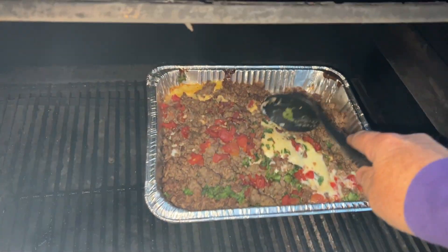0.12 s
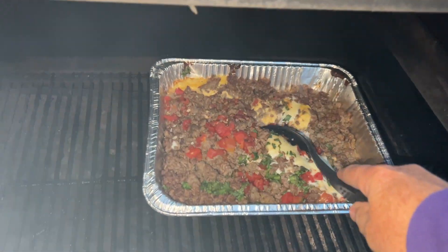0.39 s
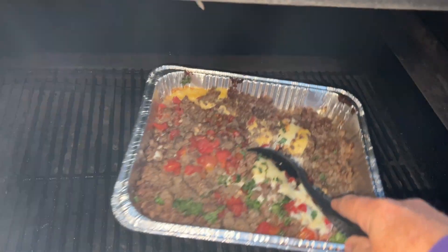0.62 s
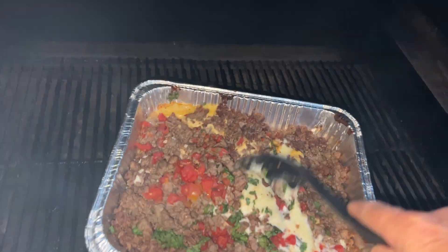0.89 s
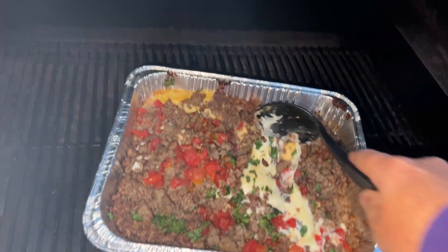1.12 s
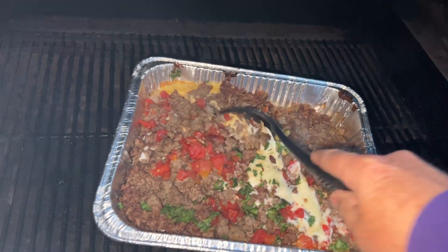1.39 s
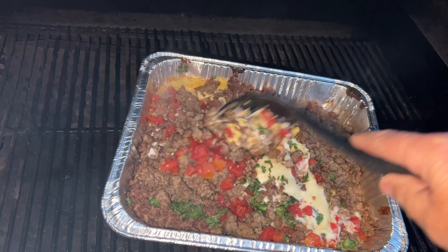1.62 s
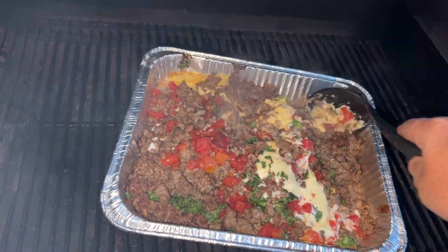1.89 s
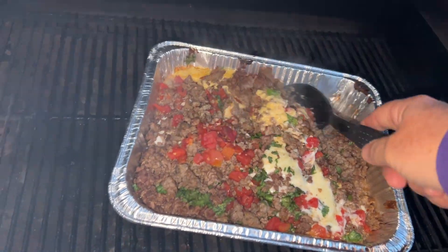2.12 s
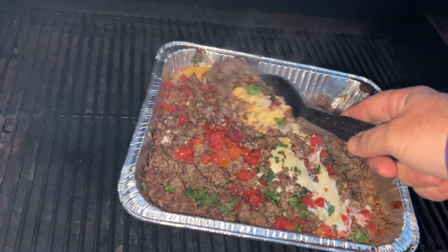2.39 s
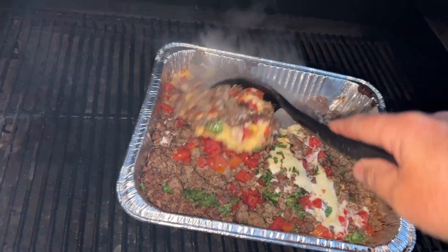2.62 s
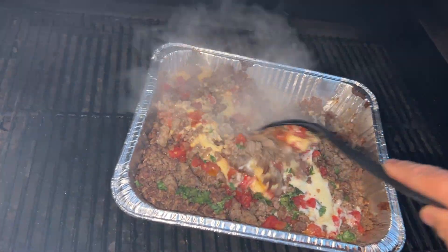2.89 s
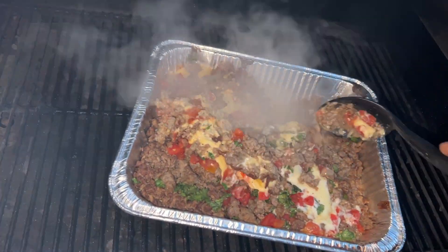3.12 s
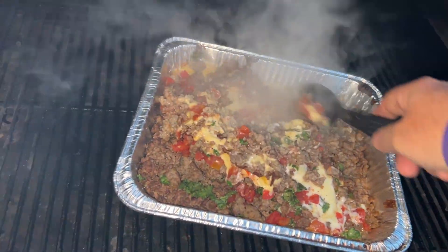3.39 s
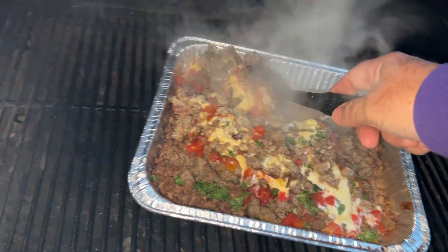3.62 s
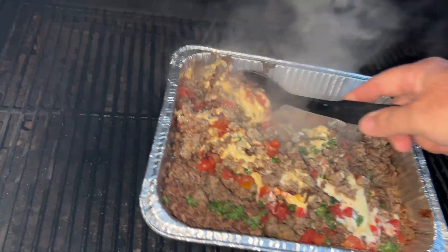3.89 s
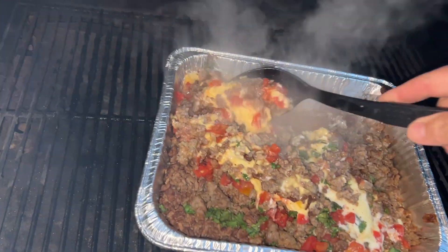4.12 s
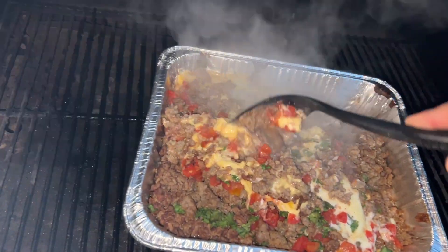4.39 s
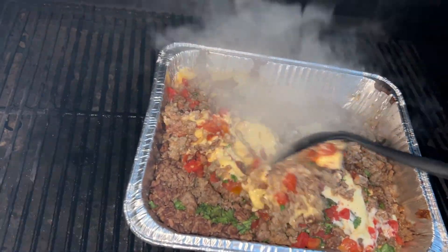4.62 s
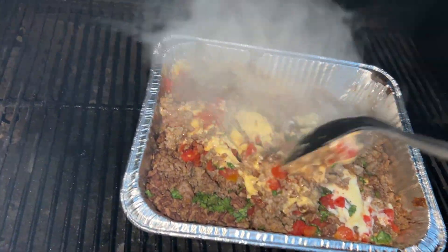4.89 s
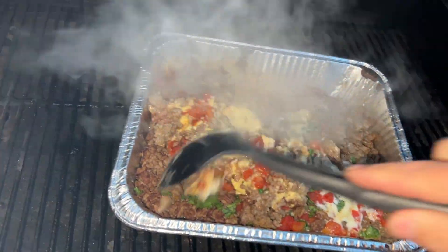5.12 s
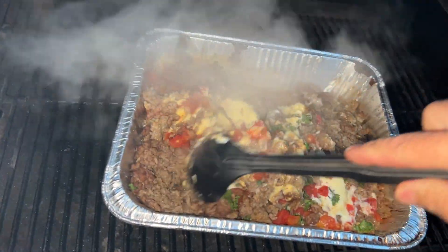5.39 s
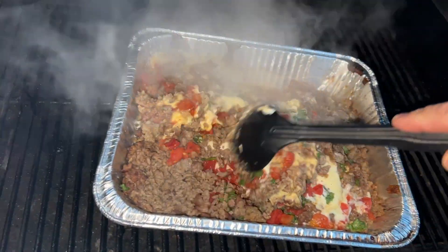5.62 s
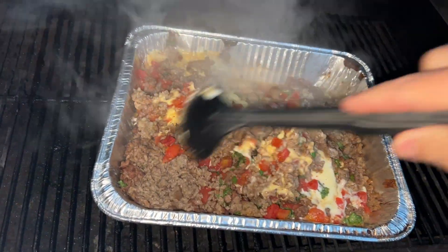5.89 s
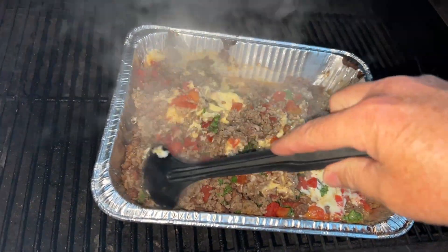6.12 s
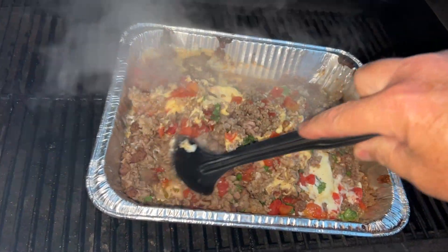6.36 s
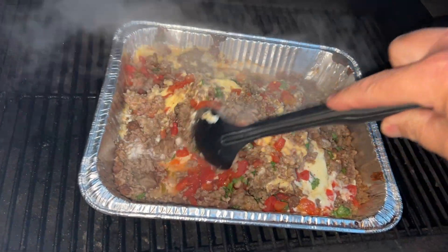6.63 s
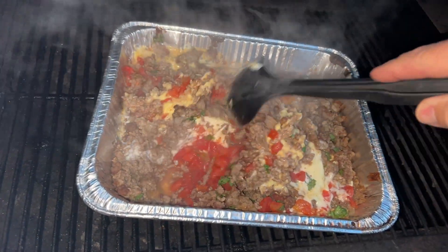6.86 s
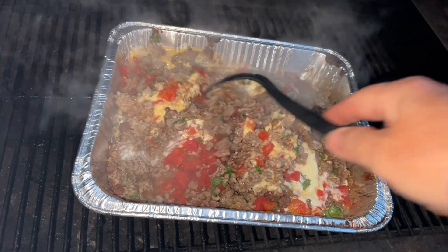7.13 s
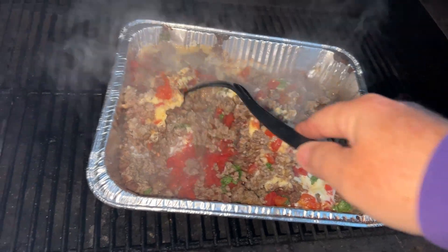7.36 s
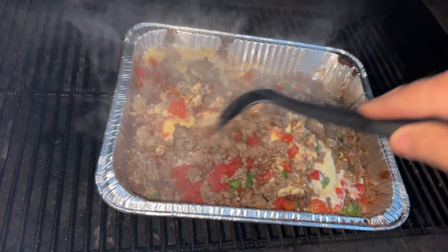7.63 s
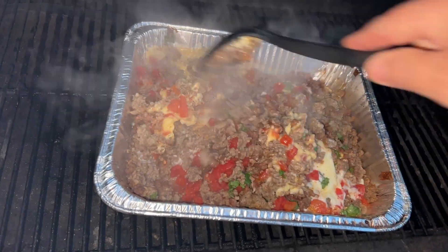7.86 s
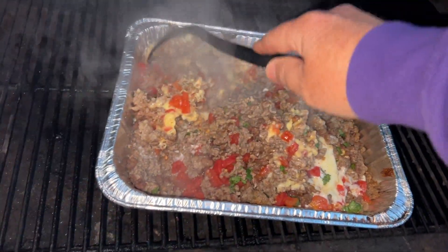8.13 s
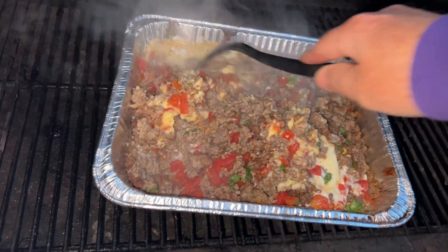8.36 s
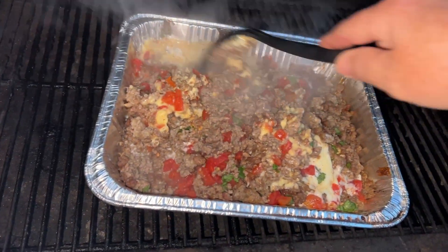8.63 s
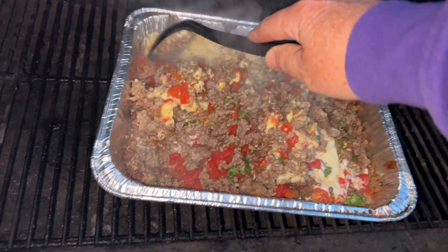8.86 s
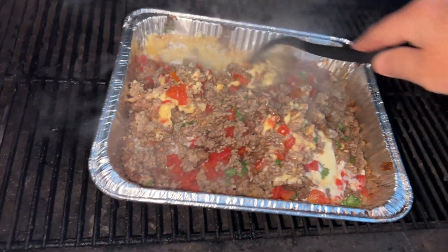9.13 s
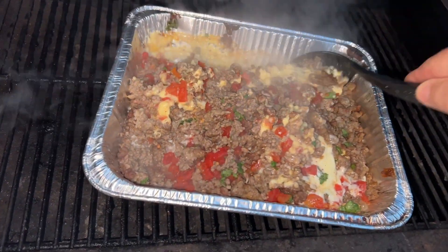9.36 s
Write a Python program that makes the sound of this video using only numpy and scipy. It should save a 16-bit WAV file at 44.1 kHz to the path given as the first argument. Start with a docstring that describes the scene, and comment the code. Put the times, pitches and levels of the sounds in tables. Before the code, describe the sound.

A deep, steady grill roar opens the scene, a low blower drone around 230 Hz mixed with fiery turbulence in a steel barrel, soft air hiss and faint fuzzy whistles. From 0.1 to 1 second a plastic spoon scrapes firmly across a foil tray with bright rustle and a knock near 0.6; smaller rubs and crisp ticks follow until about 1.8. Between 2.5 and 4.2 the roar flutters in uneven surges while dropping, the whistles having faded, with another clear scrape around 3.6. Afterwards the hum keeps sinking gently, leaving sparse light rubs, tiny crackles and foil ticks, the sharpest at 5.75. A thin whine near 8 kHz flickers in, notably at 3.0, 4.6, 5.7 and 8.35. Ticks and a dull knock cluster at 8.5, and a soft scrape comes around 9.1. Close stereo, bass centred, treble wide.

```python
"""A pellet grill's blower and fire roar inside the steel barrel and slowly ease off, with hiss and thin motor tones.
A plastic spoon turns food in a foil tray: the foil rustles, scrapes and ticks; a thin high whine comes and goes.
Roar, hiss and rubbing are shaped noise, motor and whine are sine waves, ticks and knocks are short noise bursts.
Two close microphone ports hear the bass nearly alike and the treble with turning phase."""
import sys
import numpy as np
from scipy import signal
from scipy.fft import rfft, irfft
from scipy.io import wavfile
from scipy.ndimage import uniform_filter1d

SR = 44100
rng = np.random.default_rng(int(sys.argv[2]) if len(sys.argv) > 2 else 0)


def undo_db(level):
    """Turn decibels back into plain size, where 20 dB means ten times bigger."""
    steps = np.asarray(level, float) / 20
    return 10 ** steps


def wav_record(signal):
    """Record a signal, one row per channel, as 16-bit PCM in the file named by sys.argv[1]."""
    frames = np.transpose(np.atleast_2d(signal))
    bounded = np.clip(frames, -1, 1)
    # unit amplitude maps onto the largest positive 16-bit level
    quanta = np.round(bounded * 32767).astype(np.int16)
    wavfile.write(sys.argv[1], SR, quanta)


N = 418950  # length in samples


def evened(x):
    """Scales a signal to an rms of one."""
    return x / np.sqrt(np.mean(x ** 2) + 1e-20)


def read(points, hz):
    """Reads a curve by straight lines on a nearly logarithmic frequency axis."""
    f, value = np.transpose(points)
    return np.interp(np.log(hz + 50), np.log(f + 50), value)


def over_time(rows):
    """Joins (seconds, value) rows by straight lines, giving a value at every sample."""
    seconds, value = np.transpose(rows)
    return np.interp(np.arange(N) / SR, seconds, value)


def drift(hz):
    """Slow random wavering of unit rms: a sum of sines up to hz, the slower ones larger."""
    t = np.arange(0, N, 64) / SR
    slow = 0
    for f in np.geomspace(hz / 20, hz, 24):
        slow = slow + np.sin(2 * np.pi * (f * t + rng.random())) / np.sqrt(f)
    return np.repeat(evened(slow), 64)[:N]


# How far the left port runs ahead. Each row: frequency in Hz, phase lead in radians.
PORT_LEAD = [(300, 0), (780, .4), (1640, -1.1), (3620, 1.4), (5770, -1.2), (7150, -.1), (8270, -1.3),
             (9100, -3.1), (10700, -3.2), (12500, -6.2), (14700, -6.5), (15700, -8)]
# How much louder the left port is. Each row: frequency in Hz, left over right in dB.
PORT_BALANCE = [(60, 1.5), (110, 1.5), (200, 1.0), (380, -1.0), (520, -5.0), (640, -4.0), (780, 3.0),
                (1290, 2.0), (2380, 2.5), (4400, 4.5), (8120, 0.5), (15000, 0.0)]


def ports(hz):
    """Phase and loudness differences between the two ports, shared half and half."""
    half = undo_db(read(PORT_BALANCE, hz) / 2) * np.exp(.5j * read(PORT_LEAD, hz))
    return np.array([half, 1 / half])


# How alike the two ports hear noise. Each row: frequency in Hz, likeness (0 unrelated, 1 the same).
PORT_LIKENESS = [(30, 0.78), (80, 1), (130, 0.99), (290, .99), (640, 0.75), (1400, 0.27), (3100, 0.1),
                 (6800, 0.18), (8500, 0.1), (9300, 0.97), (10600, 0.99), (12000, 0.21), (15000, .9)]


def noise(shape, size, patchy_db, flicker_db):
    """Random short-time spectra with drifting patches and a shared flicker, heard by both ports."""
    hop = size // 4
    frames, hz = N // hop + 5, np.fft.rfftfreq(size, 1 / SR)
    a, b, c, d, patches = rng.standard_normal((frames, len(hz), 5)).T
    patches = uniform_filter1d(patches, size=5, axis=0)  # neighbouring frequencies
    patches = evened(uniform_filter1d(patches, size=6, axis=1))  # neighbouring moments
    flicker = evened(uniform_filter1d(rng.standard_normal(frames), size=3))
    depth_db = (patchy_db * np.ones(N))[np.minimum(np.arange(frames) * hop, N - 1)]

    same = read(PORT_LIKENESS, hz)[:, None]
    left, other = a + 1j * b, c + 1j * d
    right = same * left + np.sqrt(1 - same ** 2) * other
    spectra = np.array([left, right]) * ports(hz)[:, :, None]
    spectra *= shape(hz)[:, None] * undo_db(depth_db * patches + flicker_db * flicker)
    sound = signal.istft(spectra, nperseg=size, noverlap=size - hop)[1]
    return evened(sound[:, :N])


def peaks(rows, hz):
    """Adds up narrow humps in a spectrum from rows of centre Hz, width Hz and dB."""
    return sum(undo_db(db) / (1 + (2 * (hz - f) / width) ** 2) for f, width, db in rows)


# Draught easing off, with the flame surging on the way down. Each row: time in seconds, low roar level in dB.
ROAR_LEVEL = [(0.0, -17), (0.08, -18), (1.66, -17), (2.56, -18.5), (2.62, -23.5), (2.86, -16.5),
              (2.88, -21.5), (3.09, -16.5), (3.2, -26), (3.23, -19), (3.57, -25), (3.73, -15.5),
              (3.75, -20.5), (3.99, -26.5), (4.05, -19.5), (4.21, -25.5), (7.7, -29), (9.5, -29)]
# Level of the upper barrel resonance. Each row: time in seconds, level in dB.
UPPER_LEVEL = [(0.0, -39.5), (0.02, -32), (1.03, -29), (3.7, -30), (4.52, -37.5), (8.04, -42.5),
               (8.33, -40.5), (9.5, -40)]
# Tone colour of the low roar. Each row: frequency in Hz, relative strength in dB per Hz.
BARREL_COLOUR = [(15, -51.5), (30, -29.5), (50, -34.5), (70, -26.5), (98, -18), (116, 4), (130, 0.5),
                 (188, -9), (203, -0.5), (278, -2.5), (310, -13), (385, -28.5), (420, -36.5), (550, -77.5)]
# Tone colour of the upper resonance. Each row: frequency in Hz, relative strength in dB per Hz.
UPPER_COLOUR = [(230, -39), (390, -17), (460, 4), (528, 5.5), (564, 0.5), (651, -25), (767, -15.5),
                (996, -43.5), (1100, -42), (1430, -62), (2420, -120)]


def roar():
    """Turbulent flame and draught excite two broad resonances of the barrel."""
    low = noise(lambda hz: undo_db(read(BARREL_COLOUR, hz)), size=2048, patchy_db=2.03, flicker_db=0.51)
    upper = noise(lambda hz: undo_db(read(UPPER_COLOUR, hz)), size=2048, patchy_db=1.0, flicker_db=1.5)
    return undo_db(over_time(ROAR_LEVEL)) * low + undo_db(over_time(UPPER_LEVEL)) * upper


# Tone colour of the air hiss. Each row: frequency in Hz, relative strength in dB per Hz.
AIR_COLOUR = [(450, -31), (600, -13.5), (770, -4), (1030, -13), (1700, -16), (2200, -19), (3700, -27.5),
              (4300, -33), (5600, -38.5), (8000, -35), (10000, -38.5), (12000, -49), (14200, -52.5),
              (15700, -68)]
AIR_DB = -54  # hiss level before its slight swell
# Narrow ridges in the hiss. Each row: centre in Hz, width in Hz, relative strength in dB.
HISS_RIDGES = [(1242, 47, 2), (1813, 67, -4), (1900, 160, -1.5), (2095, 60, -4.5), (2510, 120, -2.5),
               (2734, 200, 0), (3350, 61, -5.5), (3613, 170, -6.5)]
# How strong the ridges are. Each row: time in seconds, level in dB.
RIDGE_LEVEL = [(0, -57), (1.3, -58), (2.5, -62), (4.5, -61.5), (6.5, -58.5), (7.5, -62), (8.3, -56.5),
               (9.5, -57.5)]


def air():
    """Broad hiss that follows the upper roar a little, and faint ridges at set pitches that waver in strength."""
    hiss = noise(lambda hz: undo_db(read(AIR_COLOUR, hz)), size=2048, patchy_db=-0.3, flicker_db=1.8)
    ridges = noise(lambda hz: peaks(HISS_RIDGES, hz), size=2048, patchy_db=1.3, flicker_db=2.5)
    upper_db = over_time(UPPER_LEVEL)
    swell_db = upper_db - upper_db.mean()
    return undo_db(AIR_DB + 0.2 * swell_db) * hiss + undo_db(over_time(RIDGE_LEVEL)) * ridges


# Fuzzy whistles heard at strong draught. Each row: centre in Hz, width in Hz, relative strength in dB.
WHISTLES = [(1890, 39, 1.5), (2740, 33, -0.5), (3700, 60, -7.5)]
WHISTLE_DB, WHISTLE_FADE_S = -60, 1.3  # starting level; seconds until the level has halved


def whistles():
    """Narrow bands of wavering noise that die away as the draught eases."""
    fade = 1 / (1 + (np.arange(N) / SR / WHISTLE_FADE_S) ** 4)
    bands = noise(lambda hz: peaks(WHISTLES, hz), size=2048, patchy_db=-1.0, flicker_db=2.0)
    return undo_db(WHISTLE_DB) * fade * bands


# Motor and blade tones. Each row: multiple of shaft speed (rounded to a whole number when played),
# level in dB before swelling, share of the roar's rise and fall that it follows (0 to 1).
MOTOR_TONES = [(5, -30.5, 0.8), (12, -46, 0.9), (16, -70.5, 1), (24, -75.5, 0.4), (36, -73, .1),
               (44, -73, .1), (52, -73, 0), (67.7, -76.5, 0)]
SHAFT_HZ = 46.0  # average turns per second


def motor():
    """Multiples of a slightly wavering shaft speed, each also swelling by itself."""
    turns = np.cumsum(SHAFT_HZ * (1 + .0008 * drift(3.0))) / SR
    roar_db = over_time(ROAR_LEVEL)
    swell_db = roar_db - roar_db.mean()
    out = np.zeros((2, N))
    for multiple, db, share in MOTOR_TONES:
        k = round(multiple)
        level = undo_db(db + share * swell_db + 1.85 * drift(12.0))
        wave = np.exp(2j * np.pi * (k * turns + rng.random()))
        out += 2 ** .5 * level * (ports(k * SHAFT_HZ)[:, None] * wave).real
    return out


# How the whine comes and goes. Each row: time in seconds, level in dB before wavering.
WHINE_LEVEL = [(0, -84), (.27, -67), (.5, -78), (1.3, -87), (1.75, -71.5), (2.0, -81), (2.9, -79),
               (3.04, -61.5), (3.3, -69), (3.42, -75), (4.1, -73), (4.4, -88), (4.57, -63.5), (4.75, -86),
               (5.15, -75), (5.5, -91), (5.7, -53.5), (5.82, -75), (5.93, -66), (6.15, -80), (6.45, -67),
               (7.3, -79), (7.86, -72), (8, -85), (8.35, -55.5), (8.5, -90.5), (9.5, -87)]
WHINE_HZ = 8026  # average pitch


def whine():
    """A thin, nearly steady tone that swells and fades, its phase differing between the ports."""
    turns = np.cumsum(WHINE_HZ + 1.4 * drift(5.7)) / SR
    level = undo_db(over_time(WHINE_LEVEL) + 2.0 * drift(13.0))
    phase = np.array([[.7], [-.7]])  # radians, left and right
    return 2 ** .5 * level * np.cos(2 * np.pi * turns + phase)


def add(mix, s, sound):
    """Adds a sound into the mix at s seconds, cut off at the end of the mix."""
    part = mix[:, round(s * SR):][:, :sound.shape[1]]
    part += sound[:, :part.shape[1]]


# Spoon strokes on the foil tray.
# Each row: start in seconds, length in seconds, scrape level in dB, thin top rustle level in dB.
STROKES = [(0.128, 0.41, -54.5, -61), (0.377, 0.64, -38, -44.5), (0.617, 0.38, -40, -48.5),
           (0.929, .12, -59, -61.5), (1.021, 0.19, -51, -52.5), (1.206, 0.13, -44.5, -54),
           (1.32, .07, -49, -63.5), (1.694, .13, -70, -62.5), (1.872, 0.055, -54, -77),
           (2.144, 0.32, -56.5, -67.5), (2.431, 0.087, -61, -64.5), (2.559, 0.13, -55.5, -63),
           (2.812, 0.17, -67.5, -63.5), (3.344, 0.081, -62.5, -67.5), (3.439, 0.55, -59.5, -72.5),
           (3.471, 0.068, -51.5, -65), (3.519, 0.11, -51.5, -54), (3.609, 0.17, -43, -50),
           (3.759, 0.052, -48, -68.5), (4.054, 0.092, -66, -68), (4.506, 0.072, -79, -66),
           (5.138, 0.27, -63.5, -61), (5.476, .09, -63, -62.5), (5.593, 0.22, -60.5, -54.5),
           (6.012, .11, -58.5, -56.5), (6.313, 0.064, -58, -62.5), (6.431, 0.27, -67, -63.5),
           (6.698, 0.063, -68, -61), (7.103, 0.11, -61, -79), (7.37, 0.073, -66, -75),
           (8.029, 0.031, -73, -64), (8.153, .05, -55.5, -62), (8.21, 0.17, -57, -70.5),
           (8.467, 0.088, -60, -60.5), (8.859, 0.047, -62.5, -69.5), (9.044, 0.15, -50, -58),
           (9.177, 0.19, -61.5, -64.5)]
PRESS, LIFT = 0.27, 0.41  # shares of a stroke spent pressing down and lifting off
STIR_DB, STIR_TOP_DB = -67, -79  # scrape and rustle of faint stirring between strokes


def pressure():
    """Scrape and rustle levels: every stroke presses down, holds and lifts, over a faint stirring."""
    power = np.ones(N) * undo_db([[STIR_DB], [STIR_TOP_DB]]) ** 2
    for s, length, db, top_db in STROKES:
        u = np.arange(0, length, 1 / SR) / length  # 0 to 1 through the stroke
        ramp = np.clip(np.minimum(u / PRESS, (1 - u) / LIFT), 0, 1)
        held = np.sin(np.pi / 2 * ramp) ** 2
        add(power, s, (undo_db([[db], [top_db]]) * held) ** 2)
    return np.sqrt(power)


def grit(per_s, spread_db, smooth):
    """An even level roughened by tiny slips that start at once and die in milliseconds."""
    size_db = spread_db * np.minimum(rng.exponential(1, N), 4)
    slips = undo_db(size_db) * (rng.random(N) < per_s / SR)
    dying = signal.lfilter([1], [1, -np.exp(-1 / (0.0023 * SR))], slips)
    return evened(smooth + dying)


# Tone colour of the rubbed tray. Each row: frequency in Hz, relative strength in dB per Hz.
FOIL_COLOUR = [(710, -36.5), (1200, -9), (1510, -1), (1680, -5), (2050, 3), (2360, -2), (2660, 0.5),
               (3890, 0), (4560, 0.5), (5490, -5), (7050, -5), (8640, -6.5), (11000, -8.5), (14300, -40),
               (22000, -120)]
# Tone colour of the thin top rustle. Each row: frequency in Hz, relative strength in dB per Hz.
CRINKLE_COLOUR = [(8000, -31), (10000, -5.5), (12000, -3.5), (14500, -7), (15300, -11), (15900, -22)]


def rub():
    """Friction noise: dense and even under firm pressure, gritty and patchy under light pressure."""
    scrape, rustle = pressure()
    firm = 1 / (1 + (undo_db(-46.0) / scrape) ** 3)  # 0 light, 1 firm
    body = noise(lambda hz: undo_db(read(FOIL_COLOUR, hz)), size=512,
                 patchy_db=4.75 - 1.5 * firm, flicker_db=1.0)
    top = noise(lambda hz: undo_db(read(CRINKLE_COLOUR, hz)), size=512,
                patchy_db=8.0 - 2.4 * firm, flicker_db=1.4)
    body_grit = firm + (1 - firm) * grit(per_s=86.0, spread_db=1.9, smooth=1.0)
    top_grit = firm + (1 - firm) * grit(per_s=60.0, spread_db=3.7, smooth=0.7)
    return body_grit * scrape * body + top_grit * rustle * top


def snap(db, hz, pan_db, width, t60):
    """A short burst of noise around one pitch, falling 60 dB in t60 seconds."""
    t, f = np.arange(2048) / SR, np.fft.rfftfreq(2048, 1 / SR)
    colour = 1 / (1 + (np.log((f + 1) / hz) / width) ** 2) ** 2
    phase = ports(f) / abs(ports(f))
    burst = irfft(rfft(rng.standard_normal(2048)) * colour * phase)
    burst *= undo_db(-60 * t / t60) * np.minimum(t / 0.00013, 1)
    pan = np.array([[pan_db], [-pan_db]]) / 2  # positive leans left
    return undo_db(db + pan) * burst / abs(burst).max()


# Foil ticks. Each row: start in seconds, peak in dB before panning, centre in Hz.
TICKS = [(0.2144, -44, 4970), (0.349, -39, 11000), (0.5082, -39, 4950), (1.103, -35, 4200),
         (1.127, -37, 4070), (1.195, -46, 8040), (1.24, -34, 4320), (1.2827, -31, 4400), (1.353, -35, 6900),
         (1.493, -44.5, 12500), (1.7204, -33.5, 7160), (1.8, -42.5, 12500), (2.06, -44, 9000),
         (2.144, -45.5, 6020), (2.2512, -42.5, 6540), (2.3126, -48, 4150), (2.3426, -38.5, 5240),
         (2.4637, -43.5, 13600), (2.8373, -41, 4530), (2.8912, -43, 14070), (3.388, -40, 7100),
         (3.4837, -38, 4500), (3.5728, -37, 8320), (3.667, -34.5, 4590), (4.07, -46, 13600),
         (4.1914, -45.5, 12500), (4.539, -44.5, 12500), (4.597, -54, 4330), (4.8123, -39.5, 10860),
         (4.875, -45.5, 11500), (5.0095, -38, 12600), (5.174, -36, 13750), (5.19, -47.5, 4370),
         (5.223, -33.5, 12200), (5.3458, -44.5, 11560), (5.37, -51, 4100), (5.665, -35, 14770),
         (5.7524, -23.5, 10440), (6.354, -42, 12360), (6.7808, -42, 6950), (6.8293, -46, 7310),
         (7.108, -43.5, 11800), (7.1508, -38, 7100), (7.245, -51.5, 5200), (7.41, -36, 7200),
         (7.504, -46, 12500), (7.675, -45, 14000), (8.0413, -42, 12140), (8.155, -34, 11500),
         (8.4934, -31.5, 11320), (8.5238, -33, 8700), (8.8782, -38.5, 8240), (9.1498, -37.5, 7260),
         (9.376, -41, 4500)]
# Duller knocks of spoon on tray.
# Each row: start in seconds, peak in dB before panning, centre in Hz, width as a log frequency ratio.
KNOCKS = [(.26, -33, 3280, 0.18), (.573, -27, 3150, 0.33), (1.042, -31, 1900, .16),
          (1.799, -40.5, 2020, .13), (2.228, -39.5, 1690, 0.24), (2.25, -37, 1900, 0.25),
          (3.388, -40, 1260, 0.38), (3.61, -37.5, 2880, 0.12), (4.595, -32.5, 556, .13),
          (6.05, -45, 5100, .1), (6.421, -40.5, 1900, 0.69), (7.15, -43, 3470, 0.072),
          (8.526, -35.5, 4860, 0.78), (8.528, -35.5, 1010, .38)]
# Brief thin squeaks. Each row: start in seconds, peak in dB before panning, centre in Hz.
SQUEAKS = [(.081, -44.5, 2740), (3.266, -44.5, 2790)]
KNOCK_T60_S = 0.05  # at 1.5 kHz; higher knocks die sooner


def tray():
    """Ticks of buckling foil, knocks and squeaks of the spoon, and stray small crackles."""
    out = np.zeros((2, N))
    for s, db, hz in TICKS:
        add(out, s, snap(db, hz, pan_db=4.4, width=0.26, t60=0.026 * (6000 / hz) ** 0.37))
    for s, db, hz, width in KNOCKS:
        add(out, s, snap(db, hz, pan_db=2.1, width=width, t60=KNOCK_T60_S * (1500 / hz) ** 0.66))
    for s, db, hz in SQUEAKS:
        add(out, s, snap(db, hz, pan_db=2.1, width=0.0099, t60=0.16))
    for when, pitch, strength, side in rng.random((75, 4)):  # crackles at random times
        crackle = snap(-59 + 9.5 * strength, 4600 * 3.2 ** pitch, pan_db=8.6 * side - 2.5, width=0.14, t60=0.0095)
        add(out, when * N / SR, crackle)
    return out


def scene():
    """Grill and spoon work sounding together."""
    return roar() + air() + whistles() + motor() + whine() + rub() + tray()


def top_cut(x):
    """Nothing passes above the cut-off."""
    return signal.sosfilt(signal.butter(12, 15720, fs=SR, output="sos"), x)


def record(dry):
    """Takes the finished mix as it is and stores it."""
    return top_cut(dry)


dry = scene()
out = record(dry)
wav_record(out)
```